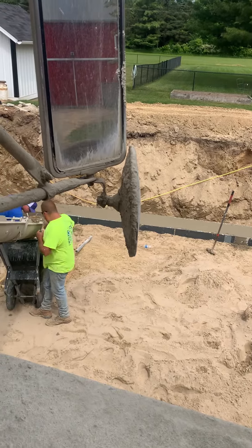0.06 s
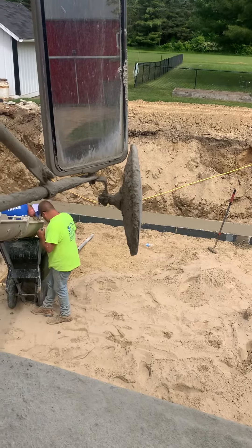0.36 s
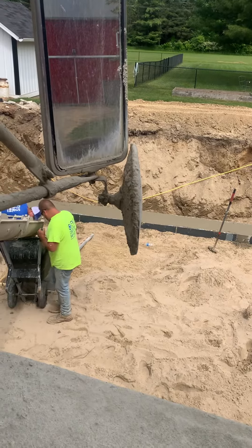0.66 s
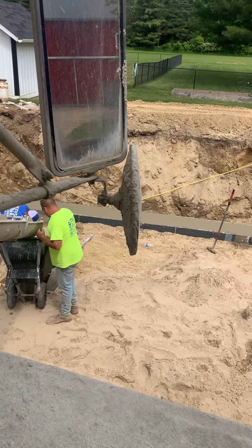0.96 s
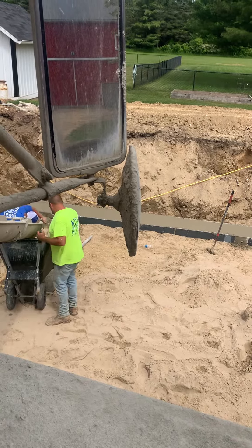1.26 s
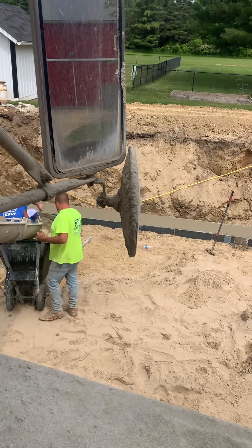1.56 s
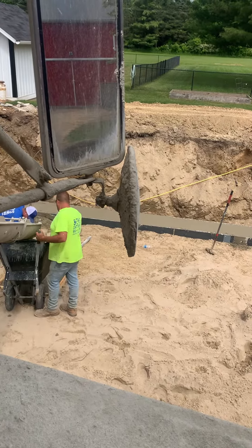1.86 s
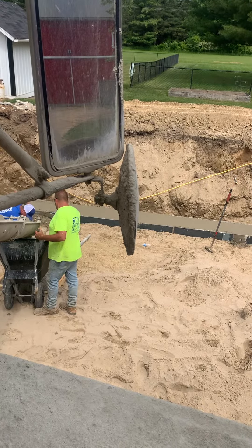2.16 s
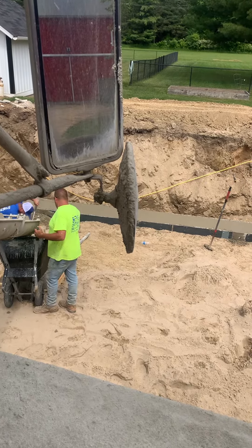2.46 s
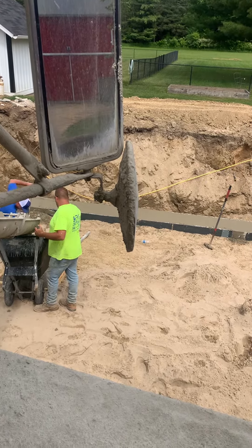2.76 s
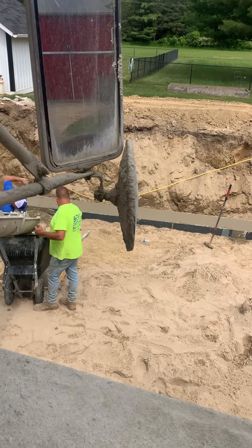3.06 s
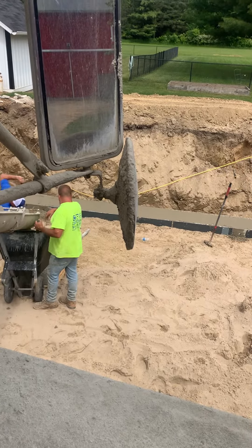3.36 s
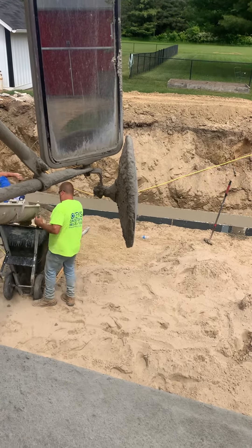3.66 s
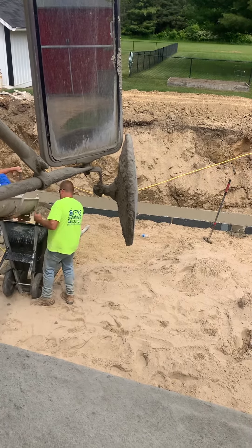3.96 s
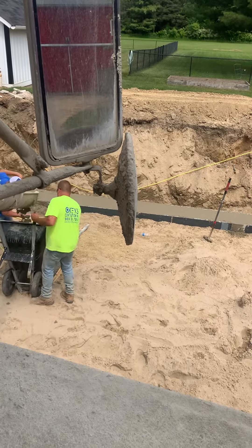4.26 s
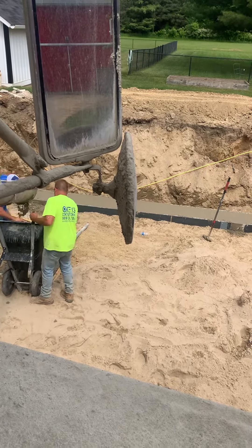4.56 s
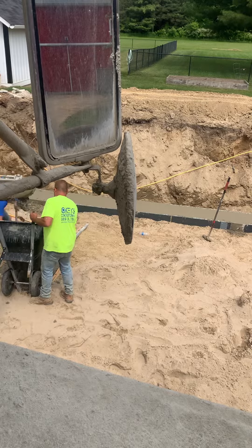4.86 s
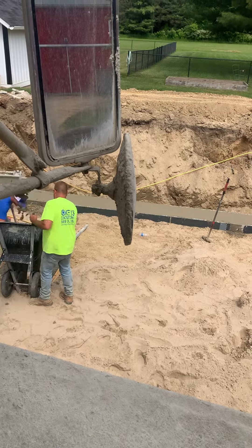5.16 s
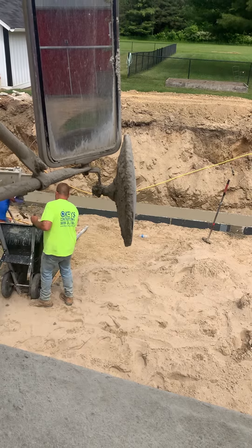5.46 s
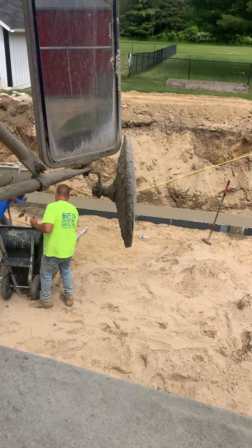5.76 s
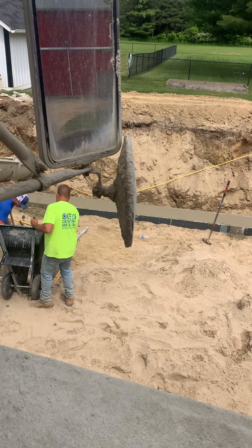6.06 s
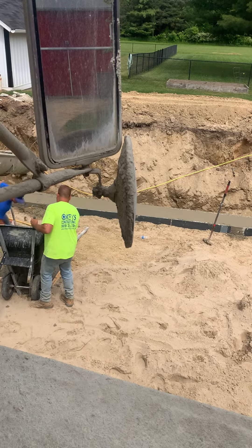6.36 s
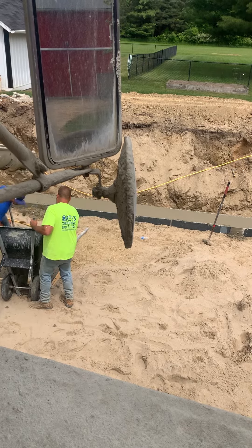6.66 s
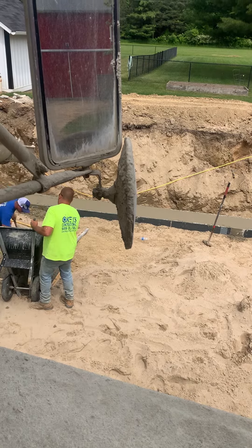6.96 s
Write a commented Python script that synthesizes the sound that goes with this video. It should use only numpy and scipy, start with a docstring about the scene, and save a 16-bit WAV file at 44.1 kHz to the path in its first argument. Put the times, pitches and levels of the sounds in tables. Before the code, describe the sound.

A concrete truck's diesel throbs and clatters outdoors; its pump starts whining, oil hisses, and the steel chute knocks and scrapes.

```python
"""A building site, at the cab window of an idling concrete mixer truck.
The six-cylinder diesel throbs, clatters and shakes a cab panel against the drone of the hydraulic pump.
After three seconds the drum takes load: the engine sags, the pump whines, oil hisses through a valve.
Wet gravel scrapes down the steel chute, which knocks and ticks now and then."""
import sys
import numpy as np
from scipy import signal
from scipy.fft import rfft, irfft, next_fast_len
from scipy.io import wavfile

SR = 44100
rng = np.random.default_rng(int(sys.argv[2]) if len(sys.argv) > 2 else 0)


def to_wav(s):
    """Save 16-bit WAV."""
    ch = np.atleast_2d(s).T  # columns
    pcm = np.round(np.clip(ch, -1, 1) * 32767)  # PCM
    wavfile.write(sys.argv[1], SR, pcm.astype(np.int16))


N = 309582
SIZE = next_fast_len(N, True)
TIME, FREQ = np.arange(N) / SR, np.maximum(np.fft.rfftfreq(SIZE, 1 / SR), 1)
SIDES = np.array([[1], [-1]])   # left, right
IDLE_RPM, FIRINGS_PER_TURN, LOAD_AT_S = 652.4, 3, 2.97
TREBLE_LAG_S = .000241
SOFT_RISE, HARD_RISE = .35, .08   # attack, as a share of a burst's length


def from_db(db):
    """Decibels to gain."""
    return 10 ** (np.asarray(db) / 20)

def rms_one(x):
    """Scale to an rms of 1."""
    return x / np.sqrt(np.mean(x ** 2) + 1e-20)

def curves(rows):
    """One curve over log frequency for each column after the first."""
    hz, *columns = np.transpose(rows)
    return [np.interp(np.log(FREQ), np.log(hz), c) for c in columns]

def bandpass(x, hz, octaves):
    """A soft band-pass of the given centre and width."""
    edges = np.minimum(hz * 2 ** (octaves * np.array([-.5, .5])), .45 * SR)
    return signal.sosfilt(signal.butter(2, edges, "band", fs=SR, output="sos"), x)

def drift(rate_hz):
    """A random wobble of roughly unit size."""
    knots = rng.standard_normal(N // 100)
    return np.interp(TIME * rate_hz, np.arange(len(knots)), knots)

def envelope(at, rise, hold=0, release=np.inf, span=slice(None)):
    """A straight attack, a hold and an exponential release, in seconds; height 1."""
    age = TIME[span] - at
    return np.clip(age / rise, 0, 1) * np.exp(-np.clip((age - rise - hold) / release, 0, 20))

def ring(hz, t60):
    """A fifth of a second of one struck mode."""
    age = TIME[:SR // 5]
    return np.exp(-np.log(1000) * age / t60) * np.sin(2 * np.pi * hz * age)

def add(out, s, sound):
    """Lay a sound into the track at time s."""
    at = round(s * SR)
    out[at:at + len(sound)] += sound[:N - at]

def left_first(x):
    """Stereo from mono, the right side a touch late."""
    return np.array([x, np.interp(TIME - TREBLE_LAG_S / 2, TIME, x)])

# Stereo image of the noise: freq_hz, coherence (0-1), left_lead_rad, left_over_right_db
IMAGE = [(50, 0.87, 0, -1), (149, 0.84, 0, 0), (290, 0.4, -0.83, -1), (624, 0.42, -1.5, -1.5),
         (1250, 0.14, 0, -1.5), (2380, 0.6, 1.72, -3.5), (3720, 0.5, 1.75, 0.5), (4320, 1, 2.5, -1)]
def noise(gain):
    """Stereo noise of rms 1: diffuse in the mids, direct and earlier on the left in the treble."""
    coherence, lead, balance_db = curves(IMAGE)
    lead = lead + 2 * np.pi * TREBLE_LAG_S * np.maximum(FREQ - IMAGE[-1][0], 0)
    pan = from_db(SIDES * balance_db / 2) * np.exp(.5j * SIDES * lead)
    mid, side = rfft(rng.standard_normal((2, SIZE)))
    spectrum = np.sqrt(1 + coherence) * mid + SIDES * np.sqrt(np.maximum(1 - coherence, 0)) * side
    return rms_one(irfft(spectrum * pan * gain, SIZE)[:, :N])

def bursts(rows, octaves, grain_db, rise_share=SOFT_RISE):
    """Grainy noise swells and dies away; rows of start_s, level_db, length_s, centre_hz."""
    out = np.zeros((2, N))
    grains = noise(1) * from_db(grain_db * drift(500))
    for s, db, length, hz in rows:
        span = slice(round(s * SR), round(s * SR) + SR)
        swell = envelope(s, rise_share * length, release=(1 - rise_share) * length, span=span)
        out[:, span] += from_db(db) * swell * rms_one(bandpass(grains[:, span], hz, octaves))
    return out

def tone(turns, order, db, waver_db, lag=0):
    """A wavering partial locked to the crankshaft; its order is its cycles per turn."""
    return np.sqrt(2) * from_db(db + waver_db * drift(6)) * np.cos(2 * np.pi * order * turns - lag)

def fader(load, free_db, loaded_db):
    """Ride a level from running free to under load, in dB."""
    return free_db + load * (loaded_db - free_db)

def pulsing(turns, firing_db, turn_db, flutter_db):
    """A gain that swells at each firing and once a turn, with some flutter."""
    firing, turn = np.cos(2 * np.pi * FIRINGS_PER_TURN * turns), np.cos(2 * np.pi * turns)
    flutter = drift(30) + .59 * drift(10)
    return from_db(firing_db * firing + turn_db * turn + flutter_db * flutter)

def recurring(gain, turns, share):
    """Noise of which a share comes back with every engine cycle of two turns."""
    place, cycle_s = turns / 2 % 1, 2 * 60 / IDLE_RPM
    fade = np.pi / 2 * place
    loop = [np.interp((1 + place) * cycle_s, TIME, c) * np.cos(fade)
            + np.interp(place * cycle_s, TIME, c) * np.sin(fade) for c in noise(gain)]
    return np.sqrt(share) * rms_one(np.array(loop)) + np.sqrt(1 - share) * noise(gain)


# Colour of the fan air: freq_hz, density_db
FAN_EQ = [(900, -5.5), (2000, -1), (2700, -1.5), (3500, 4.5), (4400, -0.5), (5300, 0.5), (6000, -4),
          (7500, -7.5), (8400, -11), (10500, -10), (13000, -19), (16000, -27)]
def fan_air(turns, settled_db=-44.5, start_extra_db=8, ease_s=4.87):
    """A bed of fan hiss pulses with the crankshaft; it eases off steadily, then stays."""
    gain = from_db(settled_db + start_extra_db * (1 - envelope(0, ease_s)))
    air = noise(from_db(curves(FAN_EQ)[0]))
    return gain * air * pulsing(turns, firing_db=.86, turn_db=.37, flutter_db=1.39)

# Modes of a cab panel: pitch_hz, relative_db, t60_s
PANEL_MODES = [(297.7, -31, 0.14), (510, -34, 0.054)]
def cab_panel(turns, revs, load, surge, jolt_at_turn=.53, jolt_s=.003):
    """Each turn of the crankshaft jolts a panel into a ringing shudder, harder under load."""
    age = (turns - jolt_at_turn) % 1 / revs
    ringing = sum(from_db(db + 3.5 * drift(10) - 60 * age / t60) * np.sin(2 * np.pi * hz * age)
                  for hz, db, t60 in PANEL_MODES)
    return from_db(fader(load, -8.5, 1) - 5 * surge) * np.minimum(age / jolt_s, 1) * ringing

# Concrete falling in the drum: start_s, level_db, length_s, centre_hz
DRUM_SLUMPS = [(3.5, -28, 0.11, 108), (3.745, -18, 0.038, 89.5), (3.78, -26, 0.058, 55)]
def slumps():
    """Wet concrete slumps in the drum with low, dull thuds."""
    return bursts(DRUM_SLUMPS, octaves=.74, grain_db=4)

# Sprays of fine stones: start_s, level_db, length_s, centre_hz
STONE_SPRAYS = [(3.185, -47, .02, 13500), (4.93, -42.5, 0.39, 11000), (5.07, -46, 0.074, 11000),
                (6.125, -42, 0.045, 6500), (6.86, -41, 0.035, 6500)]
def spatter():
    """Fine stones spatter, or sizzle on as they run down the chute."""
    return bursts(STONE_SPRAYS, octaves=.86, grain_db=3)

# Gravel scrapes: start_s, body_db, grit_db, length_s
GRAVEL_SLIDES = [(3.142, -35, -62, 0.054), (3.727, -37, -43, 0.06), (4.856, -46, -38, 0.12),
                 (5.209, -40, -33, 0.076), (5.641, -32.5, -32.5, 0.047), (6.56, -42, -38, 0.048)]
def gravel(body_hz=1220, grit_hz=3270):
    """Wet gravel slides down the chute with a dull body and bright grit."""
    body = [(s, db, length, body_hz) for s, db, _, length in GRAVEL_SLIDES]
    grit = [(s, db, length, grit_hz) for s, _, db, length in GRAVEL_SLIDES]
    return bursts(body, octaves=.75, grain_db=0) + bursts(grit, octaves=2.13, grain_db=2.5)

def shovel_squeak(start_s=5.226, level_db=-34, length_s=.03, pitch_hz=1590, rough_db=2):
    """A shovel squeaks once on the chute: a short, rough metallic tone."""
    swell = envelope(start_s, SOFT_RISE * length_s, release=(1 - SOFT_RISE) * length_s)
    note = np.sqrt(2) * np.sin(2 * np.pi * pitch_hz * TIME)
    return from_db(level_db + rough_db * drift(200)) * swell * note

# Small hits on metal: start_s, snap_db, note_db, pitch_hz
STEEL_TICKS = [(4.851, -46, -31, 2875), (5.054, -29, -33, 11200), (5.591, -42, -30, 3380),
               (6.1224, -40, -34, 3880), (6.1275, -34, -28, 11500), (6.1334, -34, -32, 10800),
               (6.1514, -41, -39, 6600), (6.546, -30, -35, 6120), (6.5784, -35.5, -36, 6680),
               (6.6534, -40, -31, 3160), (6.8504, -41, -38, 6360), (6.8597, -29.5, -27, 3370)]
def ticks(snap_hz=6700, snap_s=.0065, t60_s=.052):
    """Stones and tools strike bare steel: a bright snap and one short, high note."""
    notes = np.zeros(N)
    for s, _, db, hz in STEEL_TICKS:
        add(notes, s, from_db(db) * ring(hz, t60_s))
    snaps = [(s, db, snap_s, snap_hz) for s, db, _, _ in STEEL_TICKS]
    return bursts(snaps, octaves=2, grain_db=2.5, rise_share=HARD_RISE) + left_first(notes)

# Modes of the loaded chute: pitch_hz, relative_db, t60_s
CHUTE_MODES = [(366, -18, 0.023), (454, -18, .035), (542, -4.5, 0.042), (657, -6, 0.033), (796, -18, 0.019),
               (1000, -13, 0.038), (1137, -10, 0.04), (1750, -17, .024), (2410, -14, .021)]
# Blows and their rebounds: start_s, blow_db, contact_hz (brightness)
CHUTE_BLOWS = [(0.0887, -21, 1900), (0.0904, -12.5, 715), (.099, -28, 1600), (0.1084, -20, 950),
               (5.7345, -20, 2200), (5.7382, -20, 850), (5.745, -23, 500), (5.761, -28, 1200)]
def chute_knocks(crack_db=-12, crack_s=.0035):
    """Each blow cracks and rings the chute's damped modes; a soft contact dulls both."""
    body = np.zeros(N)
    for s, blow_db, contact_hz in CHUTE_BLOWS:
        modes = sum(from_db(blow_db + db + rng.normal(0, 1)) * ring(hz, t60)
                    for hz, db, t60 in CHUTE_MODES)
        add(body, s, signal.sosfilt(signal.butter(2, contact_hz, fs=SR, output="sos"), modes))
    cracks = [(s, db + crack_db, crack_s, hz) for s, db, hz in CHUTE_BLOWS]
    return body * from_db(SIDES * -.5) + bursts(cracks, octaves=1.8, grain_db=1.5, rise_share=HARD_RISE)

def cavitation(bubbles_per_s=260, spread_db=7, centre_hz=6330):
    """Tiny bubbles of uneven size collapse in the valve with a gritty crackle."""
    sizes = from_db(spread_db * np.minimum(rng.exponential(1, N), 3)) * rng.choice([-1, 1], N)
    clicks = sizes * (rng.random(N) < bubbles_per_s / SR)
    return left_first(rms_one(bandpass(clicks + 1e-18, centre_hz, octaves=.17)))

# Colour of the rushing oil: freq_hz, density_db
OIL_EQ = [(2500, -26), (3300, -1), (5000, 0.5), (5600, 8), (6600, 0), (7400, 1.5), (8800, 3), (9700, 0),
          (11500, 0.5), (13500, -0.5), (16000, -6.5)]
# Whistles of the valve: pitch_hz, width_hz, relative_db
VALVE_WHISTLES = [(3390, 80, -11), (3950, 130, -14), (4560, 220, -11), (6140, 140, -7.5), (6505, 90, -17),
                  (6660, 90, -19), (7400, 120, -21), (8700, 280, -14), (11110, 210, -13.5)]
def oil_hiss(load, surge):
    """Oil rushes unevenly through the valve; load adds fluttering whistles and crackle."""
    peaks = sum(from_db(db) / np.sqrt(width) / (1 + (2 * (FREQ - hz) / width) ** 2)
                for hz, width, db in VALVE_WHISTLES)
    rush = noise(from_db(curves(OIL_EQ)[0])) * from_db(.49 * drift(8.4) + 1.8 * drift(150))
    whistles = from_db(-1.5 + 1.6 * drift(18)) * noise(peaks)
    crackle = from_db(-17.5) * cavitation()
    return from_db(fader(load, -50, -43) - 1.5 * surge) * (rush + load * (whistles + crackle))

# Each cylinder's rap, in firing order: level_db
CYLINDER_RAPS = [-37, -44.5, -39, -42, -36.5, -42]
def diesel_knock(turns, revs, centre_hz=950, decay_s=.0032, at_firing_share=.3):
    """Each firing gives the block a short, hard rap."""
    firing, share = np.divmod(FIRINGS_PER_TURN * turns - at_firing_share, 1)
    strength = from_db(CYLINDER_RAPS)[firing.astype(int) % len(CYLINDER_RAPS)]
    age = share / (FIRINGS_PER_TURN * revs)
    return strength * np.exp(-age / decay_s) * rms_one(bandpass(noise(1), centre_hz, octaves=1.7))

# Colour of the diesel clatter: freq_hz, density_db
CLATTER_EQ = [(200, -8.5), (480, 1), (660, -2), (800, 0.5), (1100, -0.5), (1350, -5.5), (1900, -11),
              (2700, -13), (4000, -13.5), (9000, -55)]
def diesel_clatter(turns, load, surge):
    """A fluttering midrange clatter that partly repeats with each engine cycle."""
    clatter = recurring(from_db(curves(CLATTER_EQ)[0]), turns, share=.4)
    clatter *= pulsing(turns, firing_db=.2, turn_db=-.04, flutter_db=1.5)
    return from_db(fader(load, -39, -37.5) - 2 * surge) * clatter

# Colour of the block's rumble: freq_hz, density_db
RUMBLE_EQ = [(18, -14), (30, -9), (50, 2.5), (80, -0.5), (110, 1), (150, -4.5), (200, -11), (240, -13),
             (290, -6), (380, -16), (490, -9.5), (640, -24.5), (1200, -54)]
def block_rumble(turns, surge):
    """The engine block rumbles, heaving once a turn and swelling with the pressure surge."""
    rumble = recurring(from_db(curves(RUMBLE_EQ)[0]), turns, share=.45)
    rumble *= pulsing(turns, firing_db=.5, turn_db=1.45, flutter_db=.77)
    return from_db(-32 + 4.5 * surge) * rumble

def block_shake(turns, load, surge):
    """The block shakes at the firing rate, harder under the pressure surge."""
    return tone(turns, FIRINGS_PER_TURN, fader(load, -38, -43.5) + 13 * surge, waver_db=2.5, lag=np.pi / -2)

# Hum of belts and gears: crank_order, free_db, loaded_db
BELT_PARTIALS = [(26.12, -50, -49), (26.12, -48, -48), (30.12, -53.5, -53), (44.9, -59, -62),
                 (50.1, -48, -49), (74.76, -56, -59), (80.3, -72, -60.5), (109.7, -55, -67)]
def belts(turns, load, strain, dip_db=4):
    """Belts and gears hum throughout, falling back under the starting strain."""
    hum = sum(tone(turns, k, fader(load, free, loaded) - dip_db * strain, waver_db=3, lag=k * k)
              for k, free, loaded in BELT_PARTIALS)
    return hum * from_db(SIDES * -1.1)

# Throb of the exhaust, ahead of its fader: crank_order, free_db, loaded_db
EXHAUST_PARTIALS = [(4, -62, -40), (5, -55, -60), (6, -25.5, -26.5), (7, -46, -56), (8, -56, -57),
                    (9, -25, -35.5), (10.5, -50, -56), (12, -42, -56), (15, -40.5, -46.5)]
def exhaust(turns, load, surge, dispersion_rad=.279, tuned_order=10):
    """Three firings a turn; unequal cylinders fill in the orders between."""
    # the muffler smears each pulse: orders far from its tuning shift most in phase
    throb = sum(tone(turns, k, fader(load, free, loaded), waver_db=.5,
                     lag=-dispersion_rad * (k - tuned_order) ** 2)
                for k, free, loaded in EXHAUST_PARTIALS)
    return throb * from_db(fader(load, -1, .5) - 15 * surge - .15 * SIDES)

# Whine of the pump, ahead of its fader: crank_order, level_db
WHINE_PARTIALS = [(20, -49.5), (30, -46), (40, -39), (46, -59), (60, -65)]
# Groan at full strain: crank_order, level_db
GROAN_PARTIALS = [(15, -42), (30, -41.5), (43, -52), (70, -45)]
# Brief dips in the whine's strongest partial: centre_s, depth_db
LEAD_DIPS = [(3.38, 13), (4.18, 1), (4.35, 8), (4.49, 16), (5.41, 13), (6.63, 4)]
def pump_whine(turns, load, strain, surge, lead_order=40, dip_s=.028):
    """The pump whines under pressure and groans under strain; its lead swells as the strain lets go."""
    dips_db = sum(db * np.exp(-((TIME - s) / dip_s) ** 2) for s, db in LEAD_DIPS)
    lead_db = 2.5 * envelope(3.79, rise=.05, hold=.2, release=.1) - dips_db
    whine_db = fader(load, -10.5, -.5) + .5 * surge
    whine = sum(tone(turns, k, db + whine_db + (k == lead_order) * lead_db, waver_db=1, lag=k)
                for k, db in WHINE_PARTIALS)
    groan = strain * sum(tone(turns, k, db, waver_db=1.5, lag=k) for k, db in GROAN_PARTIALS)
    return (whine + groan) * from_db(.84 * drift(30))

# Drone of the ten pistons, ahead of its fader: crank_order, level_db
DRONE_PARTIALS = [(10, -22.5), (20, -44)]
def pump_drone(turns, surge, bypass_shut_s=.11):
    """The free-running pump drones, then ducks as the load comes on and the bypass valve shuts."""
    shut = envelope(LOAD_AT_S, bypass_shut_s)
    drone = sum(tone(turns, k, db, waver_db=.7) for k, db in DRONE_PARTIALS)
    return drone * from_db(fader(shut, .03, -17) + 8.5 * surge - .2 * SIDES)

def drum_drive(load_rise_s=.2694, droop_rpm=16, sag_rpm=20.95, recover_s=10, pressure_lag_s=.35):
    """The drum engages: lasting load, passing strain, oil pressure surge (each 0-1) and turns per s."""
    load = envelope(LOAD_AT_S, load_rise_s)
    strain = envelope(3.17, rise=.282, hold=.1992, release=.23)
    keep = np.exp(-1 / (pressure_lag_s * SR))
    surge = signal.lfilter([1 - keep], [1, -keep], strain)   # the pressure trails the strain
    droop = envelope(LOAD_AT_S, load_rise_s, release=recover_s)   # the governor slowly wins speed back
    rpm = IDLE_RPM - droop_rpm * droop - sag_rpm * strain
    return load, strain, surge, rpm / 60

def scene(hum_lag_s=.00019):
    """Engine, hydraulics and chute in the open air; one crankshaft times all the machinery."""
    load, strain, surge, revs = drum_drive()
    turns = np.cumsum(revs) / SR + 1 / 8
    hum_turns = turns - SIDES * revs * hum_lag_s / 2   # the hum reaches the left a little later
    engine = block_shake(hum_turns, load, surge) + exhaust(hum_turns, load, surge)
    engine += block_rumble(turns, surge) + diesel_clatter(turns, load, surge) + fan_air(turns)
    drive = pump_drone(hum_turns, surge) + pump_whine(hum_turns, load, strain, surge)
    drive += belts(hum_turns, load, strain) + oil_hiss(load, surge)
    rattle = cab_panel(turns, revs, load, surge) + diesel_knock(turns, revs)
    chute = chute_knocks() + ticks() + gravel() + spatter() + shovel_squeak()
    return engine + drive + rattle + chute + slumps()

def record(dry, cutoff_hz=15800):
    """A steep low-pass takes off the very top."""
    return signal.sosfilt(signal.ellip(12, .1, 90, cutoff_hz, fs=SR, output="sos"), dry)


dry = scene()
out = record(dry)
to_wav(out)
```